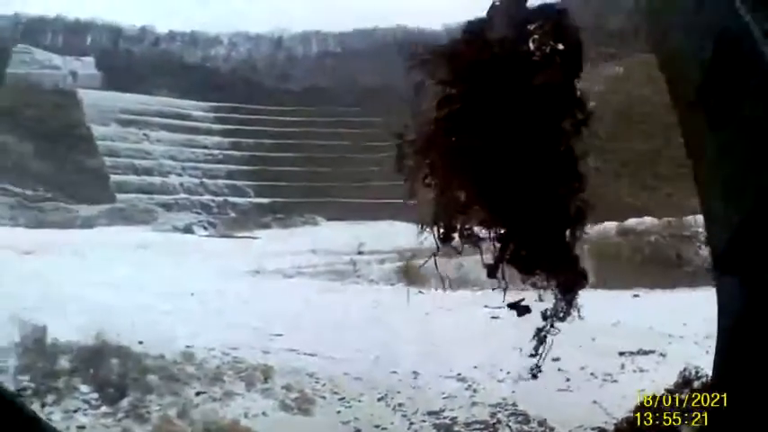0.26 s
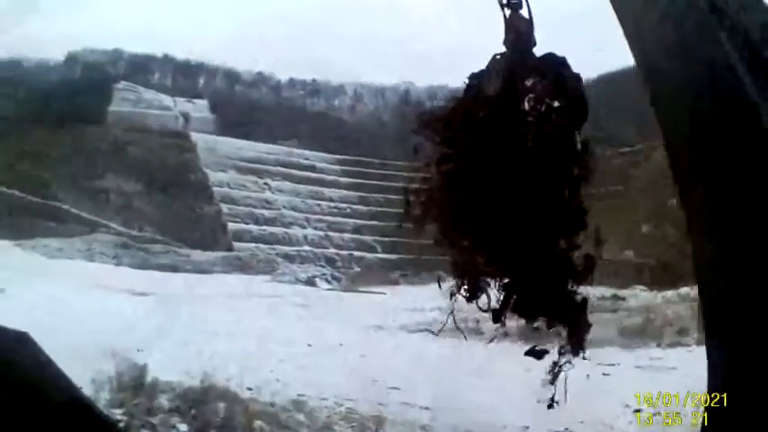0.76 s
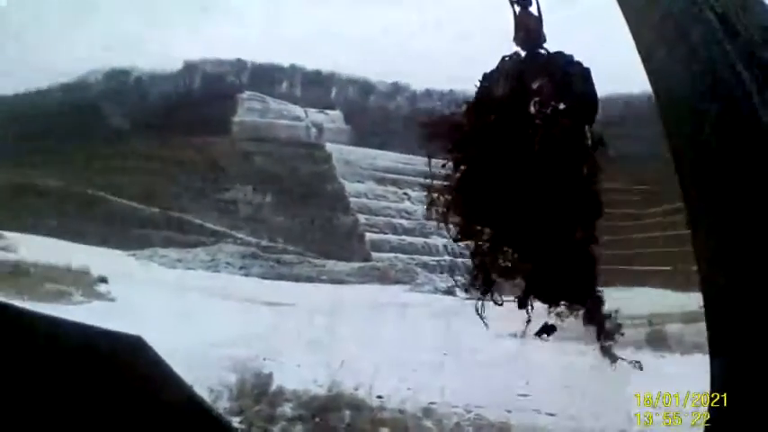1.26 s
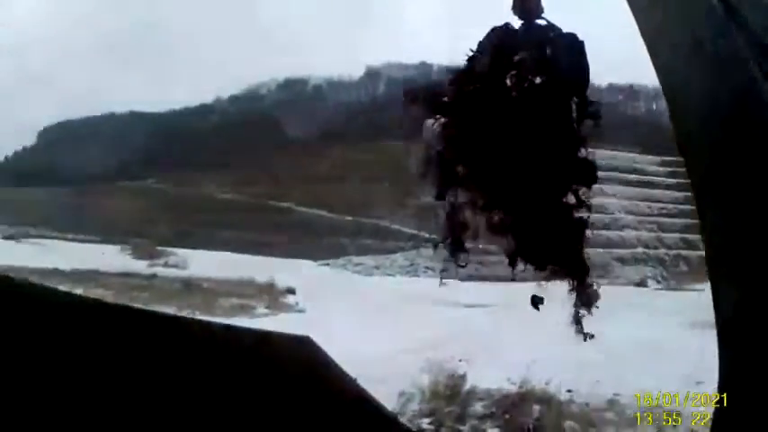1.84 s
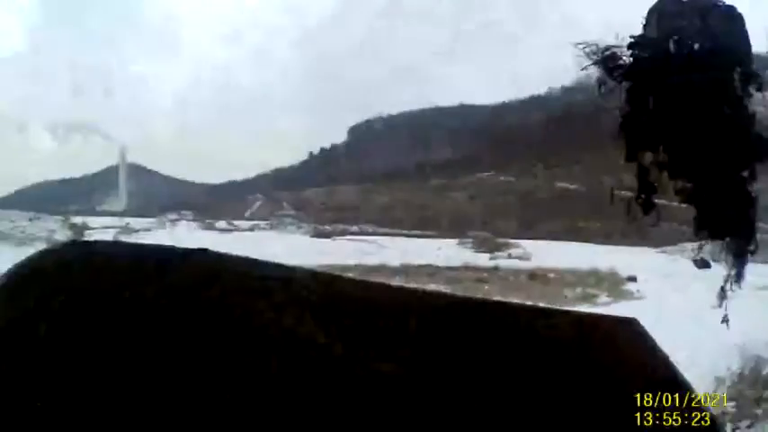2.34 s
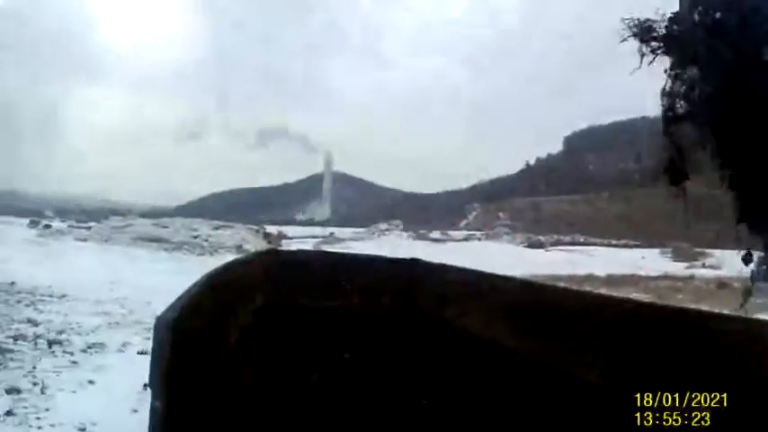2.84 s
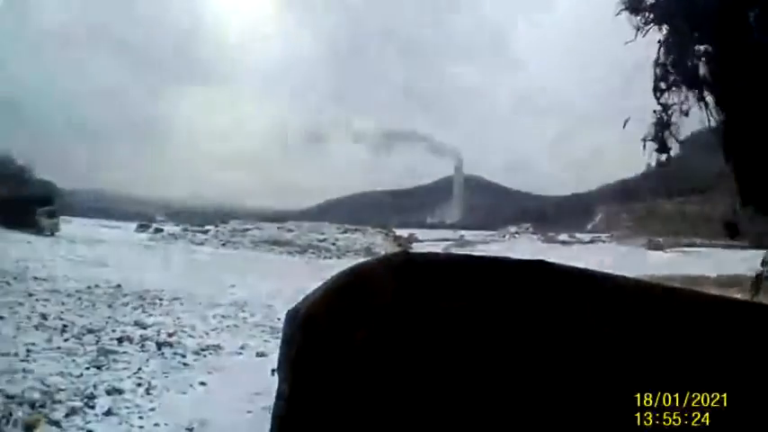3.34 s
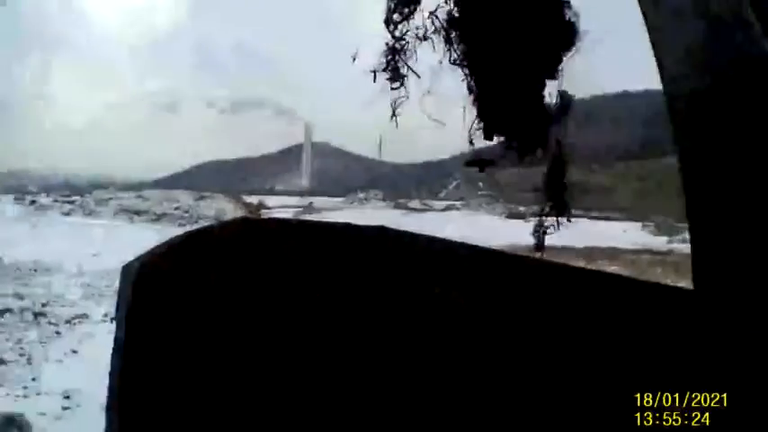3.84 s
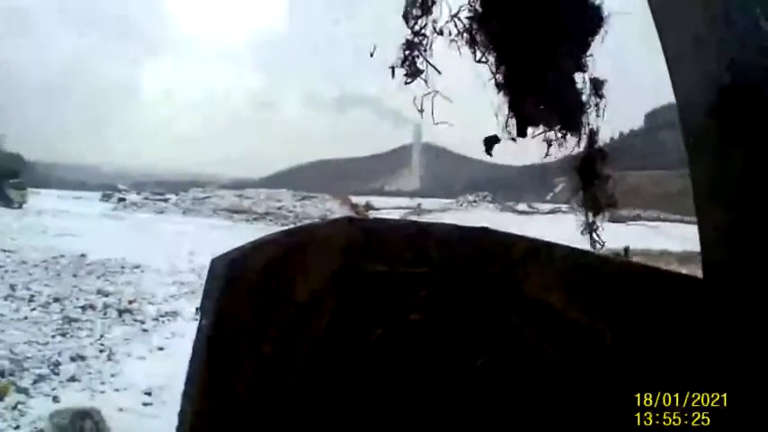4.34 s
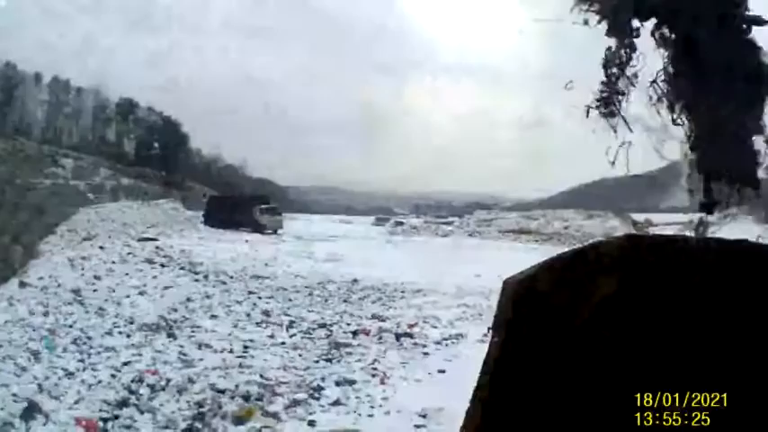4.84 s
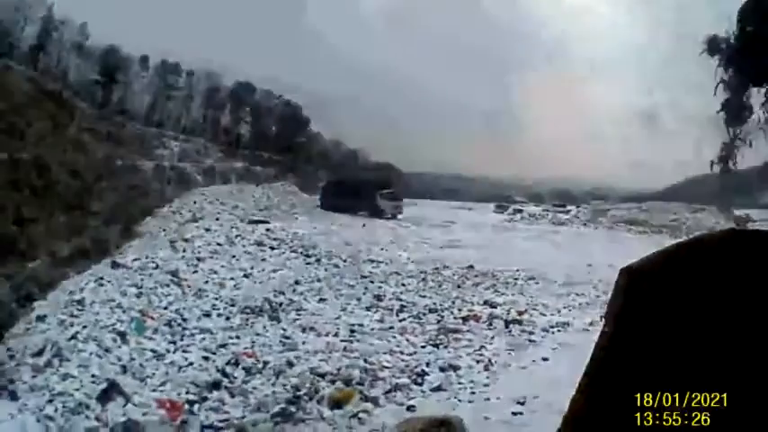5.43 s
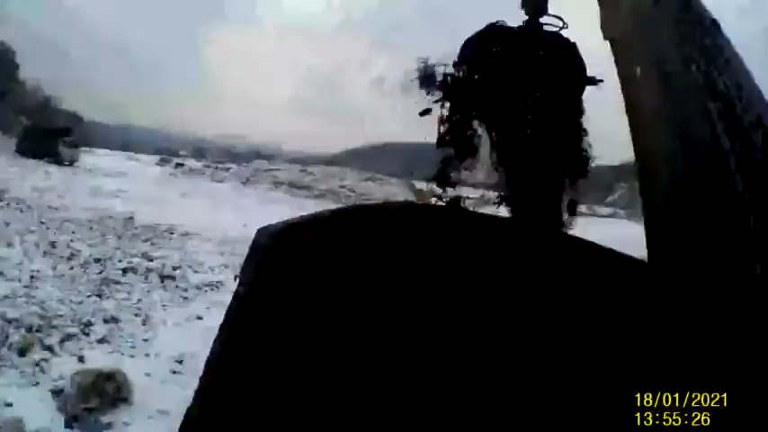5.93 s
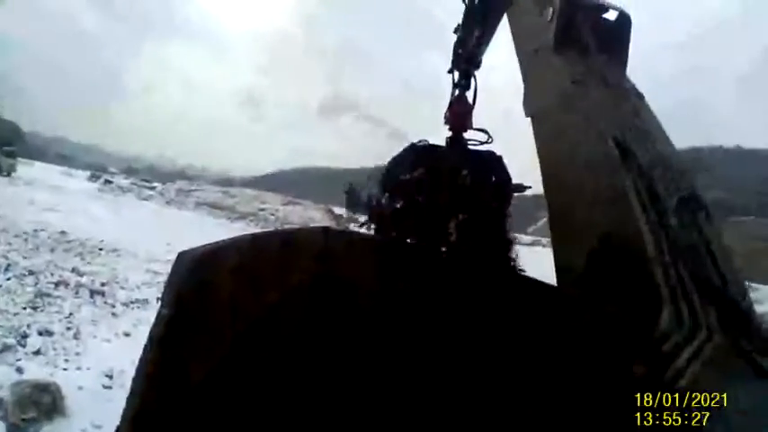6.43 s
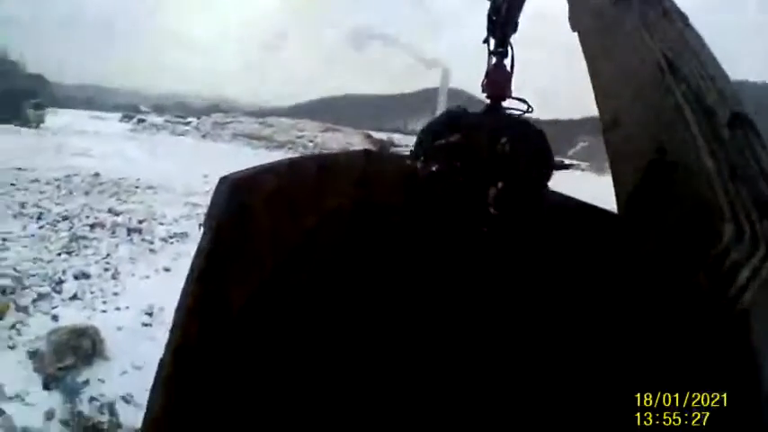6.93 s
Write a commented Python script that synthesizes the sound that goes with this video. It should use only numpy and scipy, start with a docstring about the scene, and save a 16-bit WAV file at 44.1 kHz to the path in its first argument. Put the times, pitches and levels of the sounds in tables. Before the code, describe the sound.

Heard inside a grapple loader's cab at a waste site: steady diesel and fan drone, wavering hydraulic pump whine and rushing oil. A few dry knocks early, then rapid metallic ticking, a calmer stretch, one violent clanging knock past the middle, and finally crunching judders, knocks and squeaks over louder oil hiss. Close, dull mono microphone.

```python
"""A diesel and its fan drone under a hydraulic pump's whine, in the cab of a grapple loader swinging waste.
Engine, fan and pump are stacks of sine harmonics; oil rushing through the valves is filtered noise.
The cab takes one sharp knock: bursts of force that ring its panels and shake loose steel.
Trim knocks, joints judder, a loose fitting ticks and small parts clatter and squeak as the boom
swings back and comes down. The cab rumbles and jolts on its mounts behind it all."""
import sys
import numpy as np
from scipy import signal
from scipy.fft import rfft, irfft, next_fast_len
from scipy.io import wavfile
from scipy.ndimage import uniform_filter1d

SR = 44100
rng = np.random.default_rng(int(sys.argv[2]) if len(sys.argv) > 2 else 0)


def materialize(psi):
    """Save the field psi as 16-bit PCM at rate SR to the path in sys.argv[1].

    A 1-D psi becomes a single channel; in a 2-D psi each row is a channel.
    """
    bounded = np.clip(np.atleast_2d(psi).T, -1, 1)
    quanta = np.round(bounded * 32767).astype(np.int16)
    wavfile.write(sys.argv[1], SR, quanta)


N = 317079
T = np.arange(N) / SR

# tone colour of struck trim and small parts: frequency [Hz], relative gain [dB]
KNOCK_SPECTRUM = [(60, -33.5), (180, -4.5), (320, 12.5), (720, 3), (1000, 2), (1180, -5.5), (1400, -2),
                  (1750, -1.5), (2100, -3), (2550, -3.5), (2870, -12), (3750, -3.5), (4400, -7.5),
                  (5200, -14)]
# tone colour of the heavy knock and its rattle: frequency [Hz], relative gain [dB]
SLAM_SPECTRUM = [(60, -50), (180, -12.5), (255, -1), (330, 1), (470, 5.5), (630, 4.5), (730, 0.5),
                 (1000, 5.5), (1170, -4), (1350, 2.5), (1620, 6), (2000, 0), (2550, -1), (2870, -4.5),
                 (3300, -6), (3750, -4.5), (4400, -15), (5200, -22.5)]


def undb(db):
    """Decibels to gain."""
    return 10 ** (np.asarray(db) / 20)


def unit(x):
    """Scale to rms 1."""
    return x / np.sqrt(np.mean(x ** 2))


def attack_unit(x, size=220):
    """Scale a hit so that its loudest stretch of `size` samples has rms 1."""
    return x / np.sqrt(uniform_filter1d(x ** 2, size).max())


def curves(table):
    """The columns of a table of (s, value, ..) rows, sample by sample."""
    times, *columns = np.transpose(table)
    return [np.interp(T, times, column) for column in columns]


def walk(rate):
    """Slow random drift with a spread near 1: random steps at `rate` Hz, smoothed twice."""
    hold = int(SR / rate)
    steps = np.repeat(rng.standard_normal(N // hold + 1), hold)
    return 1.7 * uniform_filter1d(uniform_filter1d(steps, hold), hold)[:N]


def colour(x, points):
    """Causal minimum-phase filter through (Hz, dB) points."""
    size = next_fast_len(len(x) + 2048) // 2 * 2
    hz, db = np.transpose(points)
    f = np.maximum(np.arange(size // 2 + 1) * SR / size, 1)
    gain_db = np.interp(np.log(f), np.log(hz), db)
    # folding the cepstrum onto positive time makes the filter causal
    cepstrum = irfft(np.log(undb(gain_db)))
    cepstrum[1:size // 2] *= 2
    cepstrum[size // 2 + 1:] = 0
    response = np.exp(rfft(cepstrum))
    return irfft(rfft(x, size) * response)[:len(x)]


def band(x, lo_hz, hi_hz):
    """Gentle band-pass."""
    return signal.sosfilt(signal.butter(2, [lo_hz, hi_hz], "band", fs=SR, output="sos"), x)


def fade(t, t60):
    """Exponential decay, 60 dB down after t60 seconds."""
    return np.exp(-np.log(1000) * t / max(t60, .002))


def swell(t, rise, t60):
    """A straight rise, then an exponential decay."""
    rise = max(rise, .001)
    return np.minimum(t / rise, 1) * fade(np.maximum(t - rise, 0), t60)


def add(out, s, x):
    """Mix x into out from time s."""
    i = max(int(s * SR), 0)
    out[i:i + len(x)] += x[:len(out) - i]


def tone(turns, db):
    """A sine of the given rms level, with a random phase of its own."""
    return np.sqrt(2) * undb(db) * np.sin(2 * np.pi * (turns + rng.random()))


def machine(waver_db=0.73, throb_db=1.6):
    """Rotating harmonics: the pump's fundamental beats slowly with the diesel's sixth order."""
    # pump speed, rising as the load eases and sagging as the boom comes down: time [s], piston rate [Hz]
    pump_speed = [(0, 133.6), (.5, 133.4), (.9, 132), (2.4, 131.8), (3.2, 132.7), (4.1, 135.2),
                  (4.5, 135.5), (4.8, 131.8), (5.9, 131.4), (6.6, 125.8), (7.19, 126)]
    # moments when pump fundamental and sixth engine order oppose each other: time [s]
    beat_nulls = [-.5, .2, .77, 1.62, 2.42, 3.2, 3.77, 4.38, 5.45, 6.2, 6.87, 7.5]
    # whine shifting between strong harmonics: time [s], levels of harmonics 2, 3, 4, 5, 6 [dB]
    whine_levels = [(0, -67, -44, -73, -49.5, -57), (.6, -60.5, -48, -59, -50.5, -54.5),
                    (.95, -58, -48.5, -53, -51.5, -52), (1.3, -55.5, -44, -49.5, -53, -48),
                    (1.75, -57, -42.5, -49, -53, -46.5), (2.3, -60, -45.5, -53.5, -54.5, -52),
                    (2.55, -58, -56.5, -46, -56.5, -59), (2.9, -75, -61.5, -41.5, -47, -50),
                    (3.2, -66, -54, -49.5, -49, -48.5), (3.7, -57.5, -50.5, -50.5, -55.5, -55.5),
                    (4.6, -60, -54, -51.5, -62, -56), (5.0, -58.5, -45, -48, -50, -50.5),
                    (6.1, -56.5, -51.5, -54, -53, -54), (6.6, -53.5, -41, -47, -58, -53.5),
                    (7.19, -50, -43.5, -46.5, -54, -56)]
    # weaker pump harmonics: multiple of the piston rate [-], level [dB]
    pump_overtones = [(7, -70), (8, -61.5), (9, -78), (10, -72.5)]
    # diesel: multiple of the crank rate [-], level [dB]
    engine_orders = [(2, -55), (4, -65.5), (8, -64), (9, -65.5)]
    # cooling fan's blade tone: time [s], level [dB]
    fan_levels = [(0, -51.5), (2.6, -50), (3.5, -47), (4.4, -52), (5.1, -50.5), (6.1, -49), (7.19, -48)]
    # weaker fan harmonics: multiple of the blade rate [-], level relative to the blade tone [dB]
    fan_overtones = [(2, -10.5), (4, -13)]
    pump_hum_db, engine_hum_db = -56.5, -58  # rms
    fan_ratio = 2.4  # piston strokes per blade pass

    pistons = np.cumsum(curves(pump_speed)[0]) / SR
    beats = np.interp(T, beat_nulls, np.arange(len(beat_nulls)))
    sixth_order = pistons - beats
    crank = sixth_order / 6
    pump_hum = undb(pump_hum_db) * np.sin(2 * np.pi * pistons)
    engine_hum = undb(engine_hum_db) * np.sin(2 * np.pi * sixth_order)
    hum = np.sqrt(2) * (pump_hum - engine_hum)

    pistons = pistons + .004 * walk(25)  # slight unsteadiness, in turns
    harmonics = list(enumerate(curves(whine_levels), 2)) + list(pump_overtones)
    whine = sum(tone(k * pistons, db + waver_db * walk(11)) for k, db in harmonics)
    diesel = sum(tone(k * crank, db + throb_db * walk(9.3)) for k, db in engine_orders)

    blades = pistons / fan_ratio
    fan_db = curves(fan_levels)[0] + waver_db * walk(8)
    fan = tone(blades, fan_db) + sum(tone(k * blades, fan_db + db) for k, db in fan_overtones)
    return hum + whine + diesel + fan, pistons


def oil(pistons, ripple=0.31, flicker_db=1.2):
    """Oil roars in the frame, in spurts at the piston rate, and hisses in the valves."""
    # oil flow: time [s], body roar [dB], valve hiss [dB]
    flow = [(0, -49, -52.5), (.36, -50, -58), (.7, -45.5, -55.5), (1.04, -49.5, -58), (1.65, -48.5, -58.5),
            (2.2, -42, -55), (2.5, -46.5, -58), (3.05, -45, -56.5), (3.7, -49, -57), (4.25, -46.5, -50),
            (4.55, -47.5, -54.5), (5.1, -46, -50.5), (5.45, -41, -47), (5.75, -44.5, -47), (6.0, -40, -41),
            (6.25, -39, -45.5), (6.7, -41, -46), (7.19, -43, -44.5)]
    # roar in the frame: frequency [Hz], relative gain [dB]
    roar_spectrum = [(20, 0.5), (45, -15), (100, -9), (200, -7.5), (290, -2), (450, 0.5), (620, -3),
                     (880, 2), (1060, -4.5), (1220, -9.5), (1700, -26.5), (3000, -44.5)]
    # hiss in the valves: frequency [Hz], relative gain [dB]
    hiss_spectrum = [(300, -20.5), (1000, -2.5), (1450, 4), (1750, 3), (2050, -0.5), (2500, 1), (2870, -14),
                     (3250, -6), (3700, -2.5), (4250, -5.5), (4600, -8), (5100, -8.5), (5600, -29)]
    body_db, valve_db = curves(flow)
    spurts = 1 + ripple * np.cos(2 * np.pi * pistons)
    roar = unit(colour(rng.standard_normal(N) * spurts, roar_spectrum))
    hiss = unit(colour(rng.standard_normal(N), hiss_spectrum))
    return roar * undb(body_db + 1.0 * walk(13)) + hiss * undb(valve_db + flicker_db * walk(70))


def valve(pitch_hz=902, width_hz=42):
    """Oil squeezing through sets one narrow valve resonance singing."""
    # time [s], level [dB]
    song_levels = [(0, -60), (1.8, -67), (2.25, -52.5), (2.6, -55.5), (3.3, -61), (3.7, -68.5), (5.5, -62),
                   (7.19, -55)]
    ring = band(rng.standard_normal(N), pitch_hz - width_hz / 2, pitch_hz + width_hz / 2)
    return unit(ring) * undb(curves(song_levels)[0])


def blow(t60, tail_db, tail_t60):
    """One blow: a burst of contact, with the duller reverberation of the cab."""
    t = np.arange(SR // 2) / SR
    contact = rng.choice([-1, 1], len(t)) * fade(t, t60)
    tail = band(rng.standard_normal(len(t)), 160, 990) * fade(t, tail_t60)
    return contact + undb(tail_db) * tail


def panel(push, spectrum, ring_db):
    """A force on the cab: a dense wash of panel resonances with a few longer modes over it."""
    # ringing panel modes: frequency [Hz], relative level [dB], t60 [s]
    panel_modes = [(330, -8, .16), (432, -4, .3), (484, -3, .2), (637, -3, .2), (791, -4, .15),
                   (834, -5, .15), (915, -5, .2), (1039, -4, .2), (1343, -1.5, .2), (1603, -1, .22),
                   (1700, -8, .2), (1895, -7, .2), (2300, -8, .18), (2580, -7, .18), (2726, -11, .14),
                   (3110, -10, .13), (3395, -12, .14), (3570, -14, .12), (3724, -11, .14), (3914, -14, .1),
                   (4760, -18, .12)]
    t = np.arange(SR // 3) / SR
    modes = 0
    for hz, db, t60 in panel_modes:
        modes = modes + undb(db) * fade(t, t60) * np.sin(2 * np.pi * (hz * t + rng.random()))
    ring = signal.fftconvolve(push, modes)[:len(push)]
    return colour(push, spectrum) + undb(ring_db) * ring


def slam():
    """The heavy knock: metal strikes, the panels ring, and it rebounds more softly."""
    # knock and rebounds: start [s], attack level [dB], contact t60 [s], treble tilt of the blow [dB]
    strikes = [(4.2202, -6, 0.043, 3), (4.2253, -16.5, 0.07, -1), (4.2319, -18.5, 0.072, 1),
               (4.249, -27, 0.07, -6.5), (4.2708, -23, 0.1, -5), (4.279, -30, 0.075, -6),
               (4.321, -34, 0.057, -5)]
    out = np.zeros(N)
    for start_s, level_db, t60, treble_db in strikes:
        force = blow(t60, tail_db=-12.0, tail_t60=0.28)
        push = colour(force, [(1700, 0.0028), (3500, treble_db)])
        add(out, start_s, undb(level_db) * attack_unit(panel(push, SLAM_SPECTRUM, ring_db=-54)))
    return out


def jolts(t, rate, scatter_db, t60):
    """An uneven run of small contacts, each a short burst of force."""
    sizes = undb(scatter_db * np.clip(rng.standard_normal(len(t)), -2, 1.5))
    gaps = rng.uniform(.4, 1.6, len(t))  # relative to the mean gap
    starts = ((np.cumsum(gaps) - gaps[0]) * SR / rate).astype(int)
    starts = starts[starts < len(t)]
    contacts = np.zeros(len(t))
    contacts[starts] = sizes[:len(starts)]
    force = signal.fftconvolve(contacts, fade(t, t60))[:len(t)]
    return unit(force * rng.choice([-1, 1], len(t)))


def rattle(rate=170, scatter_db=3, contact_t60=0.0182):
    """Loose steel parts rattle on after the heavy knock: a dying run of contacts."""
    # one row: start [s], attack level [dB], t60 of the run [s]
    start_s, level_db, t60 = (4.226, -32, 0.31)
    out, t = np.zeros(N), np.arange(SR // 3) / SR
    push = jolts(t, rate, scatter_db, contact_t60) * fade(t, t60)
    steel = band(colour(push, SLAM_SPECTRUM), 2300, 6300)
    add(out, start_s, undb(level_db) * attack_unit(steel))
    return out


def judders(slip_rate=380, scatter_db=2.0, slip_t60=0.029, squeal_db=-7, squeal_width_hz=240):
    """Joints stick and slip: jolts crunch in the panels and the steel scrapes at a pitch of its own."""
    # start [s], loudest moment [s], t60 [s], crunch level [dB], scrape relative to crunch [dB], pitch [Hz]
    slips = [(0.513, 0.534, 0.17, -30.5, -19, 3900), (4.183, 4.201, 0.18, -42, 0.5, 3540),
             (4.214, 4.216, .02, -29, 2.5, 3470), (5.822, 5.833, 0.12, -27.5, -1.5, 3850),
             (5.833, 5.84, 0.15, -29, -8.5, 3520), (5.91, 5.91, .1, -43.5, 3, 3920),
             (5.922, 5.921, 0.11, -32.5, 0.5, 4030), (5.936, 5.947, 0.16, -29, -2.5, 3540),
             (5.955, 5.953, 0.2, -29.5, -1.5, 3830), (5.986, 5.986, 0.13, -32, -6, 3900),
             (6.011, 6.012, 0.19, -33.5, -1, 3850)]
    # crunch in the panels: frequency [Hz], relative gain [dB]
    panel_spectrum = [(60, -21), (180, -11.5), (300, 1), (480, -6.5), (720, -0.5), (1000, 3), (1180, 0),
                      (1350, 0.5), (1620, 4), (2100, -4), (2550, 1), (2870, -18.5), (3750, -8.5),
                      (5200, -25)]
    # bright scrape of the steel faces: frequency [Hz], relative gain [dB]
    scrape_spectrum = [(1500, -38.5), (2400, -13), (2880, -18), (3300, -4.5), (3850, -1.5), (4100, -2.5),
                       (4350, -5), (4700, -7.5), (5200, -13.5)]
    crunch_tilt = [(280, 0.5), (500, 4.5), (1500, -4), (3500, -13.0)]
    out, t = np.zeros(N), np.arange(SR // 3) / SR
    for start_s, loudest_s, t60, level_db, scrape_db, pitch_hz in slips:
        push = jolts(t, slip_rate, scatter_db, slip_t60) * swell(t, loudest_s - start_s, t60)
        crunch = colour(panel(push, panel_spectrum, ring_db=-47), crunch_tilt)
        squeal = band(push, pitch_hz - squeal_width_hz / 2, pitch_hz + squeal_width_hz / 2)
        scrape = unit(colour(push, scrape_spectrum)) + undb(squeal_db) * unit(squeal)
        both = attack_unit(crunch, size=900) + undb(scrape_db) * attack_unit(scrape, size=900)
        add(out, start_s, undb(level_db) * both)
    return out


def knocks(spread=1.63, snap_share=0.85):
    """Dry knocks of trim and linkage: each part thuds at its own pitch under a bright click."""
    # start [s], attack level [dB], thud pitch [Hz], click relative to thud [dB], contact t60 of the thud [s]
    hits = [(0.1027, -37, 2300, 0.5, 0.041), (0.123, -35.5, 850, -9, .06), (0.18, -44.5, 1700, 10, 0.12),
            (0.198, -38.5, 1670, -6, 0.042), (0.213, -45, 4030, 4, 0.044), (0.283, -48, 1500, 11, 0.11),
            (0.305, -39.5, 1300, 2, 0.037), (0.314, -44, 1600, -7, 0.038), (0.3535, -47, 3500, 4, 0.035),
            (0.464, -42, 2000, -3, 0.022), (.522, -29.5, 750, -15, 0.12), (.548, -27, 710, -0.5, 0.052),
            (0.565, -32, 600, -23, 0.056), (0.581, -40.5, 1200, -6, .04), (0.657, -37, 850, -14.5, 0.051),
            (1.041, -39, 1890, -14, 0.028), (1.5505, -37.5, 1130, -17, 0.045),
            (4.175, -33.5, 1580, -15, .04), (4.66, -35, 1400, -8.5, 0.075), (4.91, -42, 4000, 3, 0.075),
            (4.937, -36.5, 1805, 7, 0.044), (5.009, -33, 2000, 7, 0.045), (5.046, -29.5, 560, -3, 0.093),
            (5.061, -35, 1700, -1, 0.076), (5.209, -31, 700, -2.5, 0.081), (5.245, -34.5, 400, -1.5, 0.082),
            (5.343, -29, 1670, -13, 0.04), (5.362, -30, 402, -25, 0.28), (5.407, -30, 1460, -1, 0.054),
            (5.418, -33.5, 1300, -7, 0.13), (5.4844, -31.5, 2080, -4, 0.063), (5.51, -28, 1230, -12, 0.054),
            (5.523, -32, 1710, -10, 0.11), (5.654, -32, 1600, 15, 0.053), (5.9205, -32, 1000, 0, .04),
            (5.944, -31.5, 1500, -6, 0.046), (6.003, -29, 800, -8, 0.07), (6.1235, -20, 1400, -7, 0.048),
            (6.136, -29, 1700, -7.5, 0.055), (6.154, -27, 1007, -12, 0.037), (6.17, -33.5, 895, 1, 0.072),
            (6.196, -33.5, 560, -19, .09), (6.225, -38.5, 1100, 4, .06), (6.315, -39, 1200, -11, .04),
            (6.3395, -36.5, 1110, -12, .04), (6.412, -35, 1000, -2, 0.11), (6.487, -38, 1210, 2, 0.047),
            (6.51, -32.5, 900, -9, 0.063), (6.5637, -27.5, 1270, -16, 0.042), (6.697, -42, 1300, 6, 0.028),
            (6.741, -35.5, 1010, -17, .04), (6.779, -35, 900, -6, 0.12), (6.892, -38, 1800, 6, 0.027),
            (6.944, -42.5, 1400, -15, 0.028), (7.023, -35, 1080, -9, 0.13), (7.1003, -39, 1510, -3, 0.041),
            (7.1515, -35.5, 1300, -5.5, 0.067)]
    out = np.zeros(N)
    for start_s, level_db, pitch_hz, click_db, t60 in hits:
        body = colour(blow(t60, tail_db=-14.0, tail_t60=0.24), KNOCK_SPECTRUM)
        snap = colour(blow(t60 * snap_share, tail_db=-21.5, tail_t60=0.15), KNOCK_SPECTRUM)
        thud = attack_unit(band(body, pitch_hz / spread, pitch_hz * spread))
        click = attack_unit(band(snap, 1200, 8300)) * undb(click_db)
        add(out, start_s, undb(level_db) * attack_unit(thud + click))
    return out


def ticks(scatter_db=1.0, crack_db=-4, crack_t60=0.0092, mode_lag_turns=0.12, detune=.003):
    """A loose fitting ticks: each strike cracks, starts the same modes and adds a small noisy bounce."""
    # strikes: time [s], peak level before the seat's offset [dB]
    strikes = [(0.7417, -38), (0.7763, -42), (0.8709, -41), (0.9342, -38.5), (0.9997, -40), (1.1657, -41),
               (1.2241, -38.5), (1.278, -39.5), (1.327, -33), (1.3796, -42), (1.431, -42), (1.5218, -38.5),
               (1.6501, -35.5), (1.703, -36.5), (1.8466, -34.5), (1.91, -36.5), (2.0083, -35.5),
               (2.0287, -35.5), (2.073, -33), (2.111, -33), (2.1559, -34), (2.2018, -35), (2.2099, -36.5),
               (2.2382, -36), (2.2529, -36), (2.2926, -35.5), (2.3084, -35), (2.352, -36), (2.3977, -34.5),
               (2.4392, -34.5), (2.4548, -38.5), (2.4608, -34.5), (2.5613, -36.5), (2.584, -37.5),
               (2.6119, -35.5), (2.6488, -40), (2.695, -34), (2.7366, -37.5), (2.7504, -39), (2.771, -36.5),
               (2.787, -35), (2.801, -40), (2.819, -40.5), (2.8385, -42), (2.857, -39), (2.883, -39),
               (2.9055, -40), (2.9533, -37.5), (2.986, -38), (3.007, -40), (3.081, -40), (3.1036, -39.5),
               (3.117, -41), (3.1316, -38.5), (3.154, -38), (3.1713, -40.5), (3.2255, -40), (3.2839, -36),
               (3.3705, -39)]
    # ringing modes of the fitting: frequency [Hz], relative level [dB], t60 [s]
    tick_modes = [(1450, 3.5, 0.043), (1780, -4, .025), (2130, 0.5, 0.05), (2240, 0.5, 0.043),
                  (2415, 1.5, 0.061), (2680, 0, 0.057), (3320, -5.5, 0.064), (3530, -7.5, 0.029),
                  (4020, 2.5, 0.025), (4100, 4.5, 0.045), (4226, 4.5, .04), (4850, -20.5, .02)]
    # the fitting shifts in its seat: time [s], level offset [dB], offset of the high modes [dB]
    seat = [(.7, 3, 2.5), (1.699, -3, -2), (2.051, 1.5, -7), (2.351, -1.5, 6), (3.3, 4.5, 3.5)]
    high_modes_hz = 3800
    bounce_s, bounce_db = 0.0038, -12  # nominal delay, scattered below
    strike_delay_s = 0.00099

    out, t = np.zeros(N), np.arange(SR // 12) / SR
    times, seat_db, bright_db = np.transpose(seat)
    for start_s, level_db in strikes:
        bright = np.interp(start_s, times, bright_db)
        ring = 0
        for hz, mode_db, t60 in tick_modes:
            size, lag, shift = rng.standard_normal(3)
            gain = undb(mode_db + bright * (hz > high_modes_hz) + scatter_db * size)
            turns = hz * (1 + detune * shift) * t + mode_lag_turns * lag
            ring = ring + gain * fade(t, t60) * np.sin(2 * np.pi * turns)
        crack = band(rng.standard_normal(len(t)) * fade(t, crack_t60), 1600, 4400)
        add(crack, bounce_s * rng.uniform(.7, 1.6), undb(bounce_db) * crack)
        strike = band(attack_unit(ring) + undb(crack_db) * attack_unit(crack), 1100, 3900)
        peak = undb(level_db + np.interp(start_s, times, seat_db))
        add(out, start_s + strike_delay_s, peak * strike / np.abs(strike).max())
    return out


def clatter(rate=105, scatter_db=3.5, t60=0.028, crack_db=3, centre_hz=1996, spread_octaves=1.3):
    """Small parts jiggle against the panels at random moments, each with a pitch of its own."""
    # time [s], level [dB]
    jiggle_levels = [(0, -54), (.3, -56), (.5, -53.5), (1.3, -51.5), (1.9, -69.5), (3.6, -65), (4.8, -56),
                     (5.4, -47.5), (5.7, -62), (6.1, -55), (6.7, -55.5), (7.19, -49)]
    out, t = np.zeros(N), np.arange(SR // 12) / SR
    for start_s in np.flatnonzero(rng.random(N) < rate / SR) / SR:
        hz = centre_hz * 2 ** (spread_octaves * rng.uniform(-1, 1))
        ring = np.sin(2 * np.pi * hz * t) * fade(t, t60)
        crack = 2 * undb(crack_db) * rng.standard_normal(len(t)) * fade(t, t60 / 2)
        size = undb(scatter_db * np.clip(rng.standard_normal(), -2, 1.5))
        add(out, start_s, size * (ring + crack))
    return unit(colour(out, KNOCK_SPECTRUM)) * undb(curves(jiggle_levels)[0])


def squeaks(wobble=0.021):
    """A small part is rubbed or tapped: one slightly unsteady resonance swells and dies."""
    # start [s], pitch [Hz], rms level at the top of the swell [dB], rise [s], t60 [s]
    rubs = [(0.104, 3380, -38.5, .002, .04), (0.149, 975, -39, 0.0025, 0.036),
            (0.187, 1090, -36, 0.0037, 0.031), (0.199, 2600, -39, .002, 0.024),
            (0.354, 3770, -47, .002, 0.11), (5.047, 342, -34.5, 0.015, 0.075),
            (5.485, 2270, -32, 0.0014, 0.083), (5.486, 4850, -36, 0.0015, 0.043),
            (6.43, 4250, -41.5, 0.0044, 0.095), (6.485, 4300, -41, 0.0044, 0.059),
            (6.553, 3860, -43.5, .005, 0.055), (6.607, 836, -32, 0.0064, 0.082),
            (6.741, 926, -36.5, .004, 0.09), (6.891, 1725, -40, .004, 0.056),
            (6.922, 3630, -43, .005, 0.032), (6.943, 765, -37.5, 0.0046, .06),
            (7.021, 890, -24.5, 0.0041, 0.034), (7.054, 4850, -44.5, 0.0037, 0.044)]
    out, t = np.zeros(N), np.arange(SR // 6) / SR
    for start_s, pitch_hz, level_db, rise_s, t60 in rubs:
        pitch = pitch_hz * (1 + wobble * walk(440)[:len(t)])
        add(out, start_s, tone(np.cumsum(pitch) / SR, level_db) * swell(t, rise_s, t60))
    return out


def shake(wobble=0.11, bump_rise_s=.017):
    """The cab rumbles on its mounts as low noise, with a few separate jolts as unsteady low tones."""
    # rumble: time [s], level [dB]
    shake_levels = [(0, -56.5), (2.9, -66.5), (3.2, -59), (3.7, -55.5), (4.1, -47.5), (4.8, -58.5),
                    (5.3, -56), (5.7, -54), (6.35, -47), (6.75, -48.5), (7.19, -54.5)]
    # rumble: frequency [Hz], relative gain [dB]
    shake_spectrum = [(12, -3.5), (25, -9.5), (65, -1), (110, -8.5), (170, -3), (260, -6.5), (500, -41.5)]
    # jolts: start [s], rms level at the top of the swell [dB], pitch [Hz], t60 [s]
    bumps = [(0.531, -49, 45, .3), (3.15, -44, 62, .25), (3.37, -44, 68, .2), (3.54, -52, 42, .3),
             (3.881, -46, 72, .2), (4.06, -48, 80, .25), (4.12, -45, 70, .25), (4.22, -41, 130, .14),
             (4.216, -41.5, 75, .25), (5.231, -41, 165, .16), (5.72, -41, 28, .22), (5.98, -39, 33, .25),
             (6.02, -42, 78, .2), (6.28, -45, 75, .25), (6.429, -46, 65, .25)]
    rumble = unit(colour(rng.standard_normal(N), shake_spectrum))
    out = rumble * undb(curves(shake_levels)[0] + 2 * walk(14.0))
    t = np.arange(SR // 3) / SR
    for start_s, level_db, pitch_hz, t60 in bumps:
        pitch = pitch_hz * (1 + wobble * walk(80)[:len(t)])
        add(out, start_s, tone(np.cumsum(pitch) / SR, level_db) * swell(t, bump_rise_s, t60))
    return out


def scene():
    """Everything heard in the cab, as one channel."""
    drone, pistons = machine()
    hits = slam() + rattle() + judders() + knocks() + ticks() + clatter() + squeaks()
    return (drone + oil(pistons) + valve() + hits + shake())[None]


def record(dry, dull_above_hz=5300, top_hz=16000):
    """The sound is dull above about 5 kHz; the heavy knock clips, and a low-pass trims the clipping."""
    narrow = signal.sosfilt(signal.ellip(8, .5, 70, dull_above_hz, fs=SR, output="sos"), dry)
    clipped = np.clip(narrow, -.8, .8)
    return signal.sosfilt(signal.ellip(8, .2, 70, top_hz, fs=SR, output="sos"), clipped)


dry = scene()
out = record(dry)
materialize(out)
```